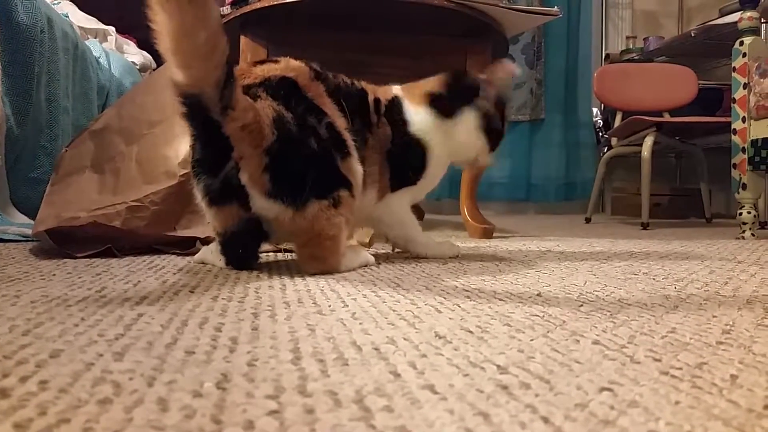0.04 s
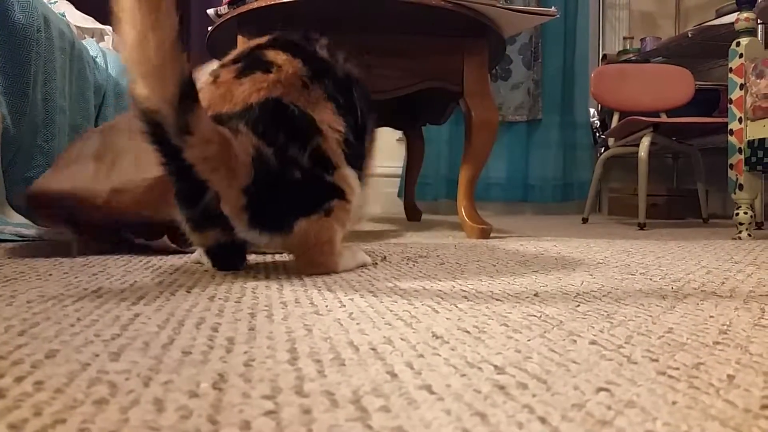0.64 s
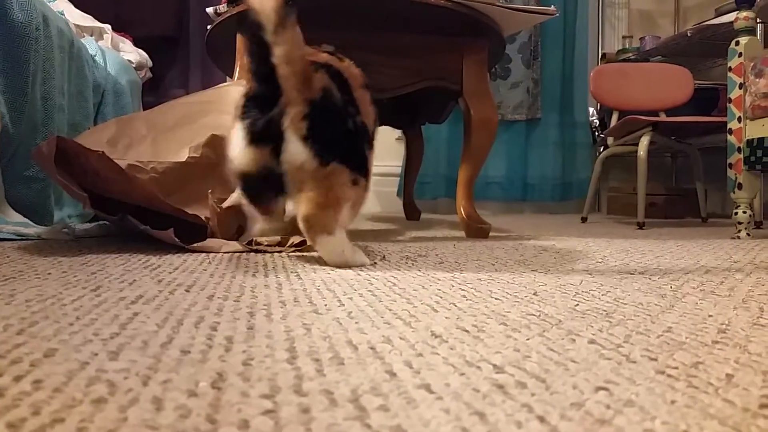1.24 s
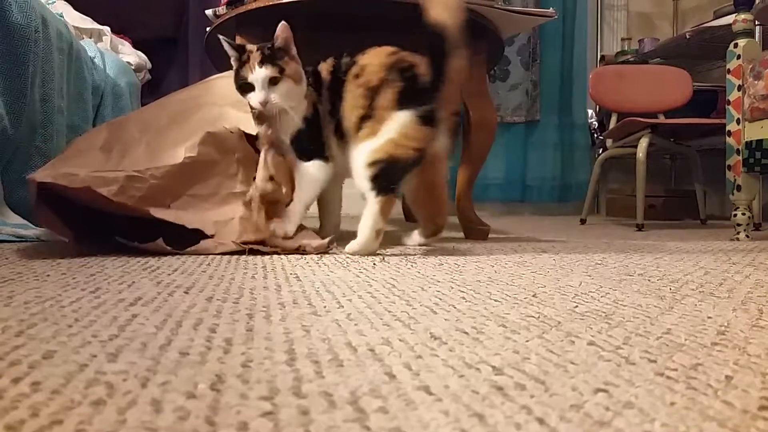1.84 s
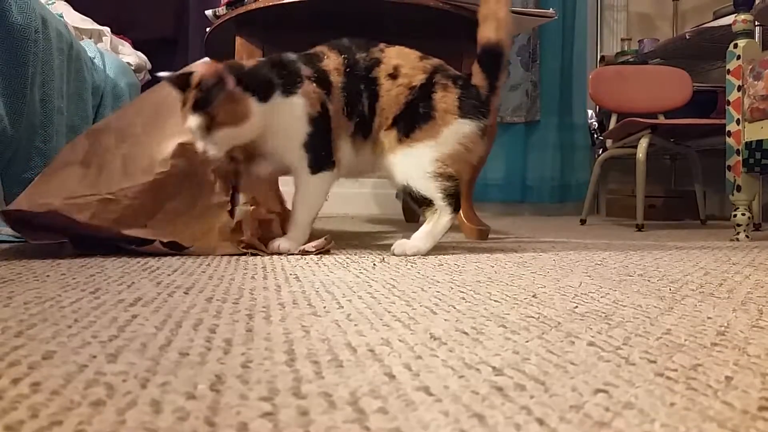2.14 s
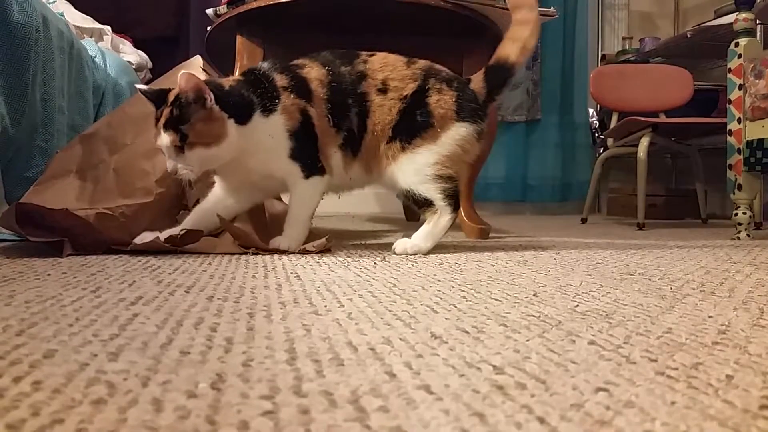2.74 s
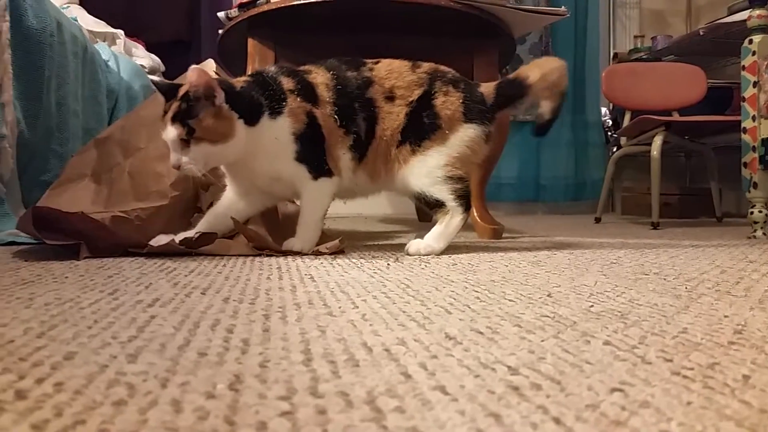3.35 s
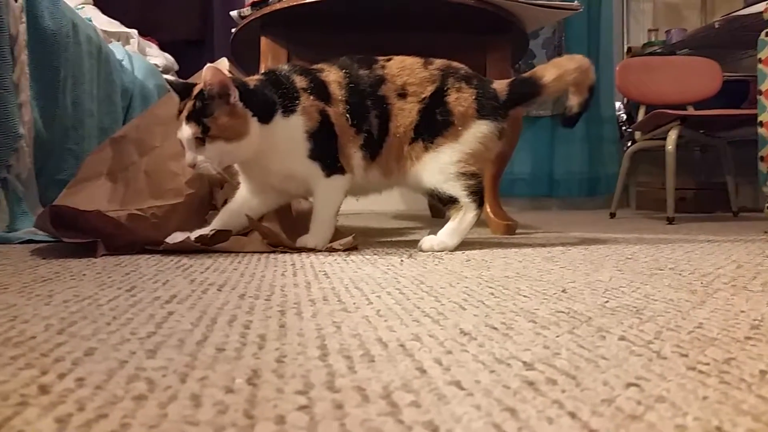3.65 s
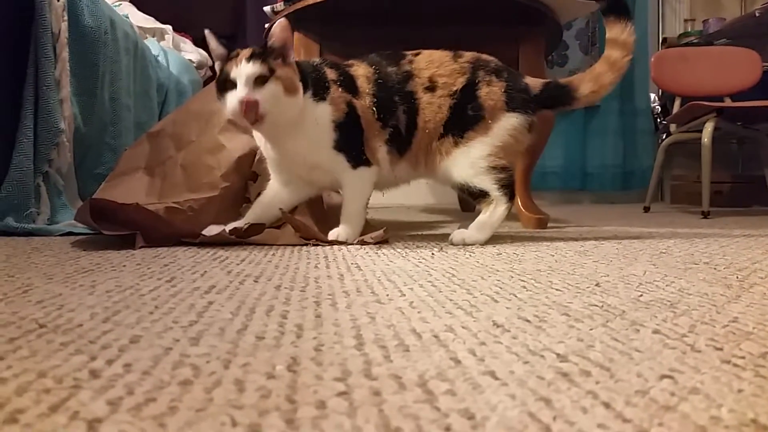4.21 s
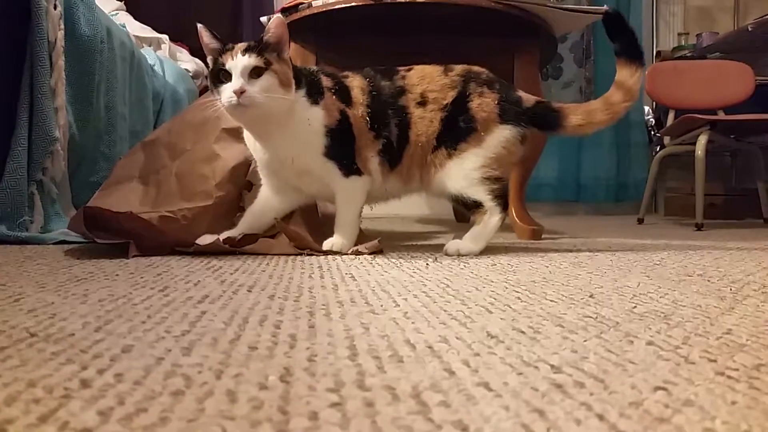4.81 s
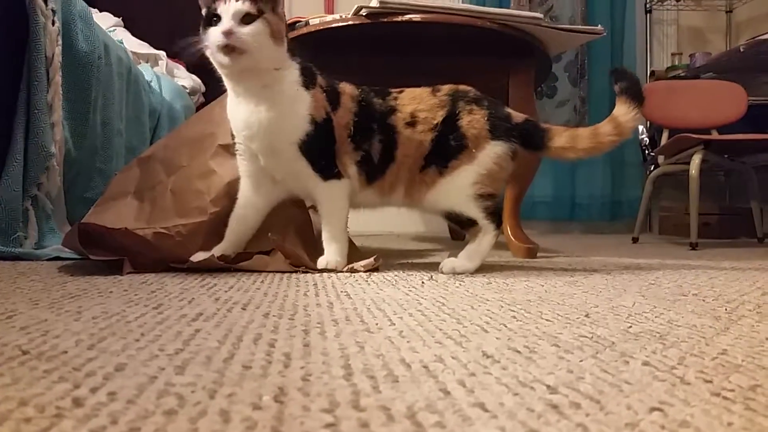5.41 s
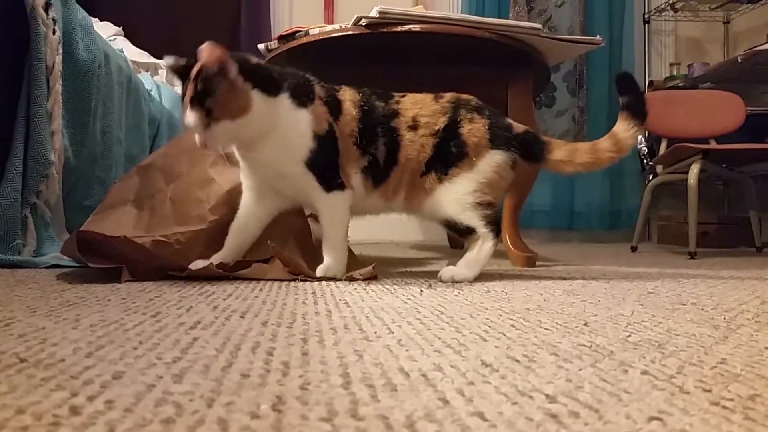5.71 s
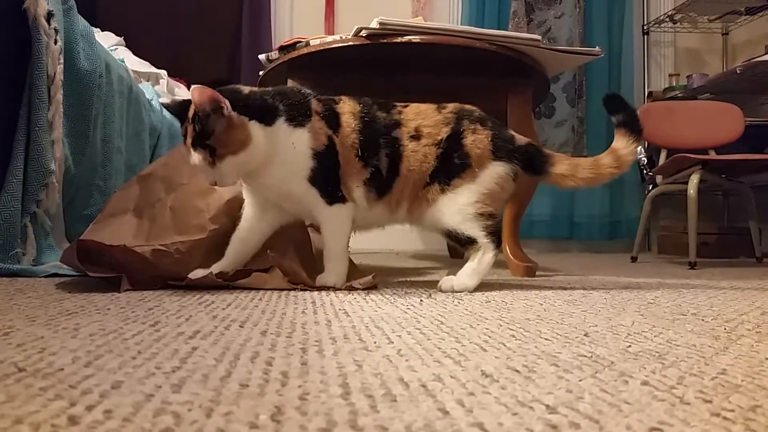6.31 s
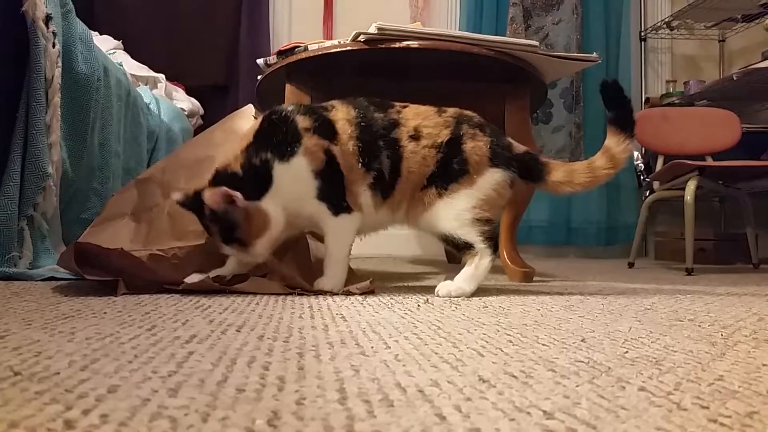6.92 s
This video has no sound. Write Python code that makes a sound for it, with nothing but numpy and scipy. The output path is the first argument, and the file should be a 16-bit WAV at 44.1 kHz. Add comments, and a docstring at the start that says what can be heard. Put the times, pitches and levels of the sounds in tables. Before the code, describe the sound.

A paper bag rustles and crackles as a cat pushes past it, followed by close handling bumps and one hard knock over a low hum.

```python
"""Paper rustles and crackles as a cat shoves past a bag on a carpet and steps on it: broad panels flap
and buckle, folds crumple, creases sizzle and snap, and the enclosed air booms.
Then the cat stands still. Fingers bump the hand-held camera close by, and one hard knock
excites the damped modes of its case. A few light, hollow taps sound in between.
Under it all a small room hums, with a faint high band of hiss."""
import sys
import numpy as np
from scipy import signal
from scipy.fft import rfft, irfft, next_fast_len
from scipy.io import wavfile
from scipy.ndimage import uniform_filter1d, map_coordinates

SR = 44100
rng = np.random.default_rng(int(sys.argv[2]) if len(sys.argv) > 2 else 0)


def int16_out(signal):
    """Quantize to a 16-bit WAV file."""
    q = np.round(np.clip(np.atleast_2d(signal).T, -1, 1) * 32767)
    wavfile.write(sys.argv[1], SR, q.astype(np.int16))


N = 311346

# the cat pushes the bag: t/s, hold/s, flap level/dB, crumple level/dB, sizzle level/dB
BAG_PUSHES = [(0.461,.012,-53,-84,-73), (0.502,0.016,-49,-82,-62), (0.552,0.043,-37,-49.5,-42.5),
              (0.613,0.028,-40,-45.5,-36), (0.678,0.065,-43.5,-51.5,-39), (0.786,0.053,-38.5,-47.5,-36),
              (0.902,0.012,-37.5,-47.5,-38), (1.08,0.0082,-44.5,-54.5,-44), (1.175,0.093,-58.5,-72,-59.5),
              (1.508,0.16,-61,-78,-60), (1.674,0.019,-42.5,-52,-35.5), (1.734,0.061,-51.5,-57.5,-45.5),
              (1.926,0.094,-59.5,-66,-46), (2.079,0.033,-44,-54,-38), (2.261,0.075,-50.5,-65.5,-49),
              (2.344,0.016,-61,-65,-39.5), (2.446,0.05,-38,-46.5,-35), (2.591,0.0051,-73,-63.5,-49),
              (2.864,0.0058,-63.5,-79,-59)]
# creases snap: t/s, tick level/dB, lower crack level/dB
CREASE_SNAPS = [(0.5374,-40,-36.5), (0.5578,-27.5,-58), (.67,-30.5,-42), (.7941,-33,-45),
                (1.259,-39.5,-52.5), (1.3762,-46.5,-62), (1.7405,-28.5,-49), (2.0603,-28.5,-49),
                (2.2333,-38.5,-50.5), (2.3416,-33,-66), (2.6037,-38,-60), (2.767,-76,-74), (2.8649,-50,-60),
                (2.9392,-45,-50.5), (3.2862,-54,-57), (4.563,-66,-72), (4.995,-50.5,-57), (5.4622,-53,-73),
                (5.474,-48,-78), (5.891,-71.5,-64.5), (6.907,-58.5,-76), (6.9682,-45.5,-63)]
# panels buckle: t/s, crack level/dB, thud level/dB
PANEL_BUCKLES = [(0.487,-62.5,-42), (0.5344,-61,-33), (0.6154,-51,-32.5), (0.7359,-48,-31.5),
                 (0.794,-48,-38), (.8495,-52,-58), (0.9044,-36.5,-39), (1.071,-40.5,-41), (1.221,-65,-47.5),
                 (2.391,-45.5,-46.5), (2.4259,-61,-27), (2.4752,-48,-26), (2.682,-76,-48)]
# the bag's cavity booms: centre t/s, level/dB, f/Hz, 1/e half-width/s
CAVITY_BOOMS = [(.505,-32.5,178,0.0069), (.555,-36.5,176,0.025), (.625,-31,154,0.0093),
                (1.043,-36,234,0.013), (1.124,-38,132,0.03)]
# fur grazes the paper: t/s, hold/s, level/dB
FUR_BRUSHES = [(.17,.085,-81), (3.92,0.05,-65), (3.99,0.025,-55), (4.15,.06,-74.5), (4.57,0.024,-75.5),
               (5.12,.22,-73), (5.5,0.009,-65), (5.6,.2,-80), (6,0.32,-86.5), (6.84,0.2,-67)]
# light hollow taps: t/s, level/dB
HOLLOW_TAPS = [(3.470, -53), (4.792, -62.5), (5.589, -51), (6.999, -56.5)]
# fingers bump the case: t/s, push level/dB, f/Hz, rattle level/dB, left minus right/dB
FINGER_BUMPS = [(3.936,-37.5,132,-59,-5), (4.107,-34,216,-60,22), (4.133,-24,95.6,-51.5,33),
                (4.149,-27,155,-47.5,6.5), (4.359,-33,111.4,-50.5,6.5), (4.55,-56,110,-59.5,-1),
                (4.784,-39,123,-50.5,7), (4.797,-48,260,-46,9), (5.125,-29.5,166,-41,8.5),
                (5.145,-36,116,-55,3), (5.321,-43.5,196,-48,7), (5.412,-48,114,-55.5,7),
                (5.585,-43,142,-45,0), (5.815,-38.5,171,-49.5,17), (5.884,-40.5,132,-49,3),
                (6.046,-43.5,128,-52.5,5.5), (6.109,-42.5,155,-47,8), (6.15,-39,89.5,-71,25),
                (6.219,-42,110,-56,5.5), (6.49,-41.5,204,-62.5,5), (6.995,-37.5,240,-51,1)]
# the grip shifts: t/s, hold/s, level/dB
GRIP_SHIFTS = [(2.75,0.065,-67), (3.42,.2,-64), (3.86,0.042,-54), (4.08,0.14,-49.5), (5.52,0.25,-49),
               (6.08,.1,-55)]
# normal modes of the case: f/Hz, relative level/dB, T60/s
CASE_MODES = [(310, 1, 0.13), (410.5, 7, 0.091), (512, -22, 0.17), (636, -19, .06), (860, -9.5, 0.051)]
# harmonics of an appliance: f/Hz, level/dB
HUM_HARMONICS = [(57.8, -51), (115.6, -65.5), (173.4, -75)]
# slow drift of the hiss: t/s, level/dB
HISS_CONTOUR = [(0,-71.5), (.4,-66.5), (2.7,-61), (3.4,-67.5), (4.3,-64), (4.75,-68.5), (5.9,-64),
                (6.3,-66), (6.75,-70.5), (7.06,-65.5)]
# reverberation time of the room: f/Hz, T60/s
ROOM_T60 = [(150, 0.44), (450, 0.18), (1000, 0.36), (4000, 0.61), (14000, 0.35)]

# noise spectra: f/Hz, relative spectral density level/dB
PANEL_SPECTRUM = [(35,-23), (60,-9.5), (105,0.5), (170,-1), (250,-4.5), (330,-5), (460,-5), (620,-9.5),
                  (850,-13.5), (1400,-28.5), (2200,-57)]
CRUMPLE_SPECTRUM = [(500, -12.5), (1000, 0.5), (1500, -0.5), (2400, -1), (3300, 2.5), (4200, 3),
                    (5200, -5.5), (7000, -12.5), (9000, -1), (15000, -36)]
SIZZLE_SPECTRUM = [(4000, -58), (7000, -51.5), (8500, -21.5), (10000, -2), (11700, 1), (13500, 0),
                   (16000, -4.5)]
BUCKLE_SPECTRUM = [(400, -13.5), (900, 10), (1500, 3), (2400, -6), (3600, -22), (5000, -14.5), (9000, -30)]
BRUSH_SPECTRUM = [(4000, -67), (8000, -43), (10000, -10.5), (11500, 1.5), (13500, -2.5), (16000, -5.5)]
TAP_SPECTRUM = [(400, -4), (700, 0), (920, 1.5), (1200, -10), (2000, -19), (3000, -14), (5000, -58)]
RUB_SPECTRUM = [(40, 8), (100, 11), (170, 4.5), (300, -6.5), (480, -11), (750, -22.5), (2000, -34.5),
                (6000, -54)]
RATTLE_SPECTRUM = [(100, 4.5), (200, 5.5), (310, 5.5), (420, 6.5), (530, 1.5), (680, -30), (1000, -20),
                   (1600, -25), (2400, -33), (4000, -16), (6000, -65)]
KNOCK_SPECTRUM = [(300, 1), (800, 13.5), (1400, -22), (2300, -4), (3500, 11), (4600, -1), (6000, -3),
                  (7500, -19), (11500, 8.5), (13500, -7), (16000, -2)]
AIR_SPECTRUM = [(20,-36.5), (28,-19.5), (42,-17), (62,-14.5), (81,-14.5), (140,-16.5), (300,-27),
                (380,-31.5), (1000,-49.5), (2200,-56), (7000,-72), (10000,-69), (14000,-56.5), (16000,-63)]
HISS_SPECTRUM = [(1500,-43), (2300,-23), (3000,-11.5), (3350,-4), (3620,1.5), (3820,-3), (3980,2),
                 (4330,-2), (4600,-13.5), (5200,-20), (6300,-36), (8000,-54)]

# likeness of left and right: f/Hz, correlation coefficient
BAG_CORRELATION = [(100, 1), (450, 0.97), (750, 1), (1300, 0.71), (2500, 0.28), (12000, .25)]
CASE_CORRELATION = [(100, 0.53), (500, 0.85), (1000, 0.33), (2000, 0.15)]
AIR_CORRELATION = [(60, 0.19), (130, 0.95), (300, 0.58), (700, 0), (1500, 0)]

# envelope of one movement: rise/(dB/s), fall/(dB/s), settling tail level/dB, tail fall/(dB/s)
FLAP_ENVELOPE = (333.5, 262.5, -13.5, 45.5)
CRUMPLE_ENVELOPE = (376, 299, -16, 52.5)
SIZZLE_ENVELOPE = (290, 278.5, -16, 68)
BRUSH_ENVELOPE = (296, 244, -13, 38.5)
GRIP_ENVELOPE = (115, 131, -6, 46)

BAG_LEAD_MS = .18  # the bag lies to the left, so its sound arrives there first
SNAP_PAN_DB, SNAP_SCATTER_DB = -4, 1.8  # left minus right of the ticks: mean, standard deviation
KNOCK_S, SETTLE_ONSET_S = 5.692, 0.023
BAND_LIMIT_HZ = 15950


def bag_rustle():
    """Stick-slip friction: panels flap, folds crumple and fibres sizzle in the same quick clumps."""
    s, hold, flap_db, crumple_db, sizzle_db = np.transpose(BAG_PUSHES)
    flap = swells(zip(s, hold, flap_db), FLAP_ENVELOPE)
    crumple = swells(zip(s, hold, crumple_db), CRUMPLE_ENVELOPE)
    sizzle = swells(zip(s, hold, sizzle_db), SIZZLE_ENVELOPE)
    clumps_db = wobble(70)
    popping = 1 + .35 * fold_pops(60, spread_db=9)
    panels = friction(900, spread_db=1.4, smooth=0.64) * amp(0.83 * clumps_db)
    folds = facet_resonances(friction(1500, spread_db=2.5, smooth=.7), depth_db=3.2)
    folds *= amp(clumps_db) * popping
    fibres = facet_resonances(friction(3000, spread_db=3.8, smooth=1.0), depth_db=2)
    fibres *= amp(1.3 * clumps_db)
    panels = flap * coloured(panels, PANEL_SPECTRUM, BAG_CORRELATION, BAG_LEAD_MS)
    folds = crumple * coloured(folds, CRUMPLE_SPECTRUM, BAG_CORRELATION, BAG_LEAD_MS)
    fibres = sizzle * coloured(fibres, SIZZLE_SPECTRUM, BAG_CORRELATION, BAG_LEAD_MS)
    return panels + amp([[3], [4.5]]) * folds + amp([[-3], [2]]) * fibres


def fold_pops(per_s, spread_db):
    """Relaxation: folds give way at uneven intervals, making an envelope of jumps and quick decays."""
    count = int(per_s * N / SR)
    jitter, weakness = rng.random((count, 2)).T
    onsets = ((np.arange(count) + jitter) / count * (N - 1)).astype(int)
    jumps = np.zeros(N)
    jumps[onsets] = amp(-spread_db * weakness)
    return unit(signal.fftconvolve(jumps, decay(0.0389))[:N])


def facet_resonances(x, depth_db):
    """Time-varying resonance: the paper's facets change shape, so narrow peaks come and go."""
    spectra = signal.stft(x, nperseg=512)[2]
    peaks = rng.standard_normal(spectra.shape[1:])
    peaks = uniform_filter1d(peaks, size=4, axis=0)  # smooth over frequency
    peaks = uniform_filter1d(peaks, size=7, axis=1)  # and over time
    return signal.istft(spectra * amp(depth_db * unit(peaks)), nperseg=512)[1][:, :N]


def bag_crackles():
    """Snap-through buckling: a crease lets go with a bright tick, a panel with a dull crack and thud."""
    out = np.zeros((2, N))
    tick = decay(.014) + .3 * decay(.07)
    for s, tick_db, crack_db in CREASE_SNAPS:
        pan_db = SNAP_PAN_DB + SNAP_SCATTER_DB * rng.standard_normal()
        add(out, s, amp(tick_db) * burst(SIZZLE_SPECTRUM, tick), pan_db)
        add(out, s, amp(crack_db) * burst(CRUMPLE_SPECTRUM, decay(.028)), pan_db / 2)
    for s, crack_db, thud_db in PANEL_BUCKLES:
        add(out, s, amp(crack_db) * burst(BUCKLE_SPECTRUM, decay(0.046)))
        add(out, s, amp(thud_db) * burst(PANEL_SPECTRUM, decay(0.07)))
    return out


def bag_booms():
    """Cavity resonance: the air in the pushed bag swells into short hollow notes."""
    t = np.arange(N) / SR
    notes = np.zeros(N)
    for s, db, hz, half_width in CAVITY_BOOMS:
        envelope = amp(db) * np.exp(-((t - s) / half_width) ** 2)
        notes += envelope * np.sin(2 * np.pi * hz * (t - s))
    return np.array([notes, notes])


def fur_brushing():
    """Light friction: fur grazing the paper stirs only the finest fibres."""
    slips = friction(2004, spread_db=4.5, smooth=.8)
    sizzle = coloured(slips, BRUSH_SPECTRUM, BAG_CORRELATION, BAG_LEAD_MS)
    return swells(FUR_BRUSHES, BRUSH_ENVELOPE) * sizzle * amp([[-3], [2]])


def finger_handling():
    """Structure-borne sound: the grip rubs; a finger pushes the case, then slips and rattles it."""
    gripping = swells(GRIP_SHIFTS, GRIP_ENVELOPE)
    out = gripping * coloured(friction(600, spread_db=1.9, smooth=1.0), RUB_SPECTRUM, CASE_CORRELATION)
    t = np.arange(SR // 3) / SR
    slip = (t / 0.011) ** 2 * np.exp(2 - 2 * t / .012)  # swells and fades in about 30 ms
    slip_rms = np.sqrt(np.mean(slip ** 2))
    for s, push_db, hz, rattle_db, pan_db in FINGER_BUMPS:
        cycles = hz * t
        envelope = cycles / 0.41 * np.exp(1 - cycles / 0.41)  # lasts about one cycle
        push = -envelope * np.sin(2 * np.pi * cycles)
        rattle = slip_rms * unit(slip * coloured(noise(len(t)), RATTLE_SPECTRUM, CASE_CORRELATION))
        add(out, s, amp(push_db) * push + amp(rattle_db) * rattle, pan_db)
    return out


def case_knock():
    """Impact excitation: the case rings in damped modes and chatters; its crack reverberates."""
    t = np.arange(SR // 3) / SR
    modes = sum(amp(db) * decay(t60) * np.sin(2 * np.pi * hz * t) for hz, db, t60 in CASE_MODES)
    body, crack = np.zeros((2, 2, N))
    add(body, KNOCK_S, amp(-32.5) * modes, pan_db=3.0)
    add(body, KNOCK_S, amp(-38.0) * burst(RATTLE_SPECTRUM, decay(0.45)))
    add(crack, KNOCK_S, amp(-36.5) * burst(KNOCK_SPECTRUM, decay(0.027) + 0.32 * decay(0.18)))
    return body + reverberate(crack, wet_db=-7)


def hollow_taps():
    """Damped resonance: light taps die away with a hollow tone near 900 Hz."""
    out = np.zeros((2, N))
    for s, db in HOLLOW_TAPS:
        add(out, s, amp(db) * burst(TAP_SPECTRUM, decay(.11)))
    return out


def background():
    """Harmonics over noise: an appliance hums in soft room air; the microphone hisses, mostly left."""
    t = np.arange(N) / SR
    hum = np.zeros(N)
    for hz, db in HUM_HARMONICS:
        wavering = amp(db + 1.8 * wobble(5))
        hum += wavering * np.sin(2 * np.pi * hz * t + .1 * wobble(1.6))
    air = amp(-57) * coloured(noise(), AIR_SPECTRUM, AIR_CORRELATION)
    hiss_gain = amp(np.interp(t, *np.transpose(HISS_CONTOUR))) * amp([[3], [-18]])
    hiss = hiss_gain * coloured(noise(), HISS_SPECTRUM, AIR_CORRELATION)
    fade_in = amp(np.interp(t, [0, .2, .45], [-9, -2, 0]))
    return (hum + air) * fade_in + hiss


def reverberate(x, wet_db):
    """Reverberation: add the room's response, each frequency decaying at its own rate."""
    hz, t, spectra = signal.stft(noise(SR // 2), SR, nperseg=256)
    absorption = amp(-60 * t / along(ROOM_T60, hz)[:, None])
    tail = signal.istft(spectra * absorption, SR, nperseg=256)[1]
    tail /= np.linalg.norm(tail[0])
    return x + amp(wet_db) * signal.fftconvolve(x, tail, axes=1)[:, :N]


def friction(slips_per_s, spread_db, smooth):
    """Shot noise: tiny slips of scattered size over a share of smooth friction noise."""
    sizes = amp(spread_db * np.clip(rng.standard_normal(N), -2, 2))
    slipping = rng.random(N) < slips_per_s / SR
    return unit(sizes * slipping * noise()) + smooth * noise()


def swells(movements, shape):
    """Incoherent addition: movements rise, hold, fall and settle; their powers sum to one envelope."""
    rise_db_per_s, fall_db_per_s, tail_db, tail_db_per_s = shape
    t = np.arange(0, N / SR, .001)
    power = np.zeros(len(t))
    for s, hold, db in movements:
        before, after = np.maximum(s - t, 0), np.maximum(t - s - hold, 0)
        tail = amp(tail_db - tail_db_per_s * after) * (1 - np.exp(-after / SETTLE_ONSET_S))
        power += (amp(db - rise_db_per_s * before) * (amp(-fall_db_per_s * after) + tail)) ** 2
    return np.interp(np.arange(N) / SR, t, np.sqrt(power))


def burst(spectrum, envelope):
    """A transient: coloured noise under a short envelope."""
    return envelope * coloured(noise(len(envelope)), spectrum, BAG_CORRELATION, BAG_LEAD_MS)


def coloured(pair, spectrum, correlation, lead_ms=0):
    """Partial coherence: two unrelated signals mix to stereo of rms 1, the left lead_ms sooner."""
    def mid_side_gains(hz):
        angle = np.arccos(np.clip(along(correlation, hz), -1, 1)) / 2
        return amp(along(spectrum, hz)) * np.array([np.cos(angle), np.sin(angle)])
    mid, side = filtered(pair, mid_side_gains)
    delay = lambda hz: np.exp(1j * np.pi * np.outer([1, -1], hz) * lead_ms / 1000)
    return unit(filtered(np.array([mid + side, mid - side]), delay))


def filtered(x, response):
    """Linear filtering: multiply the spectrum by a complex frequency response."""
    n = x.shape[-1]
    padded = next_fast_len(n + 8192)
    return irfft(rfft(x, padded) * response(np.fft.rfftfreq(padded, 1 / SR)), padded)[..., :n]


def add(track, s, sound, pan_db=0):
    """Superposition: mix a sound in at time s, pan_db louder on the left."""
    start = round(s * SR)
    sides = amp([[pan_db / 2], [-pan_db / 2]])
    track[:, start:start + sound.shape[-1]] += (sound * sides / sides.mean())[:, :N - start]


def decay(t60):
    """Exponential damping by 60 dB in t60 seconds, a third of a second long."""
    return amp(-60 * np.arange(SR // 3) / SR / max(t60, .001))


def wobble(knots_per_s):
    """Random modulation: a smooth curve through Gaussian knots."""
    knots = rng.standard_normal(int(N * knots_per_s / SR) + 4)
    return map_coordinates(knots, [np.arange(N) * knots_per_s / SR])


def noise(size=N):
    """Two uncorrelated white noises."""
    return rng.standard_normal((2, size))


def along(points, hz):
    """Interpolate (f/Hz, value) points on a logarithmic frequency axis."""
    frequencies, values = np.transpose(points)
    return np.interp(np.log(hz + 1), np.log(frequencies + 1), values)


def amp(db):
    """Level in decibels to amplitude ratio."""
    return 10 ** (np.asarray(db) / 20)


def unit(x):
    """Normalise to rms 1."""
    return x / np.sqrt(np.mean(x ** 2) + 1e-20)


def scene():
    """Superposition of the bag and taps in the room, the hand on the camera and the background."""
    direct = bag_rustle() + fur_brushing() + bag_crackles() + hollow_taps()
    in_room = reverberate(direct, wet_db=-7.5)
    return in_room + bag_booms() + finger_handling() + case_knock() + background()


def record(dry):
    """Low-pass filtering: the camera cuts off steeply at its band limit."""
    return filtered(dry, lambda hz: 1 / (1 + (hz / BAND_LIMIT_HZ) ** 150))


dry = scene()
out = record(dry)
int16_out(out)
```